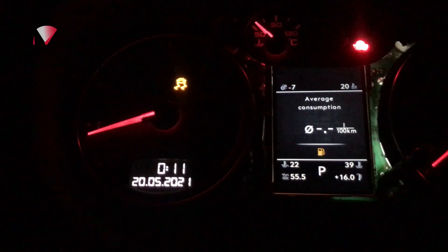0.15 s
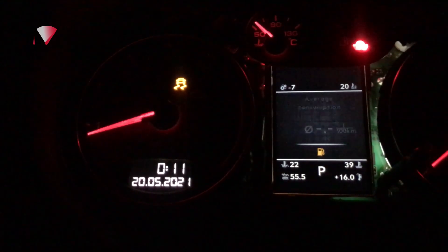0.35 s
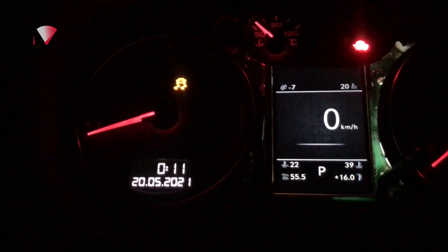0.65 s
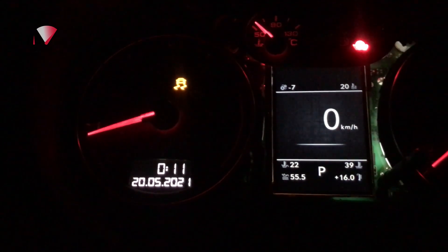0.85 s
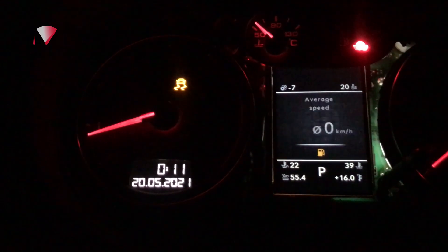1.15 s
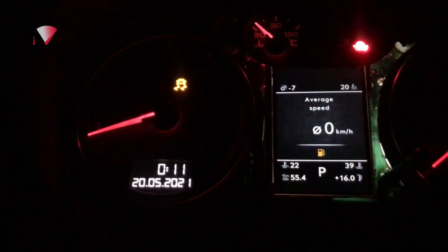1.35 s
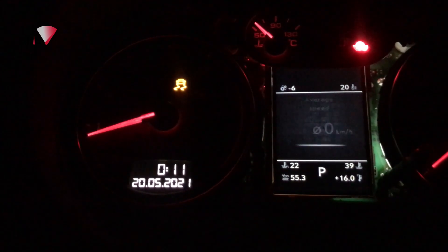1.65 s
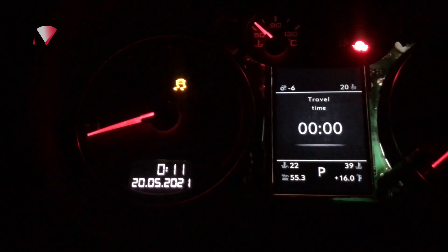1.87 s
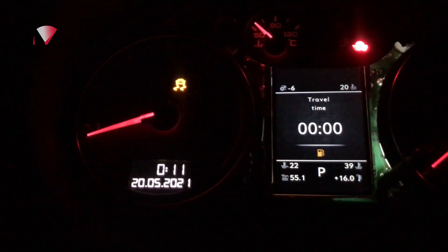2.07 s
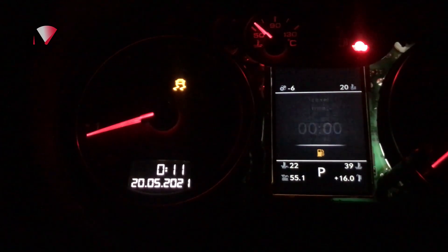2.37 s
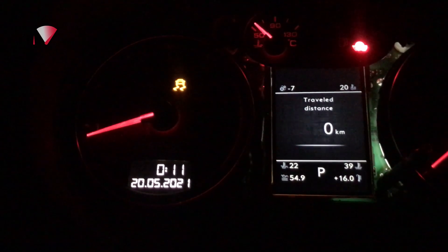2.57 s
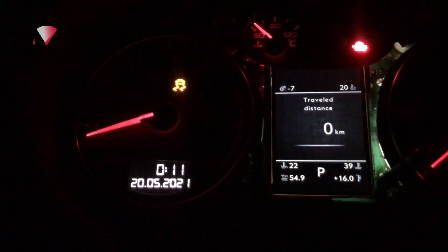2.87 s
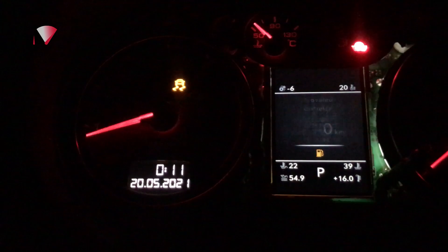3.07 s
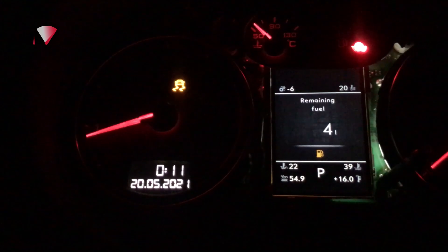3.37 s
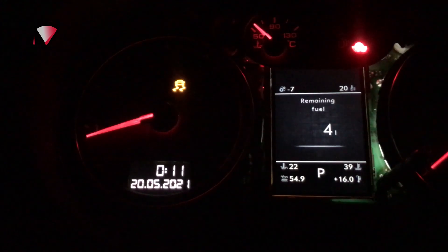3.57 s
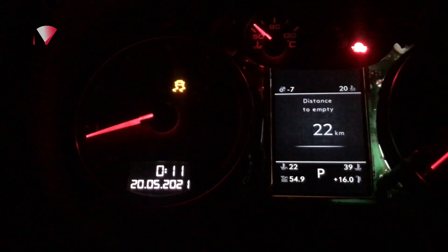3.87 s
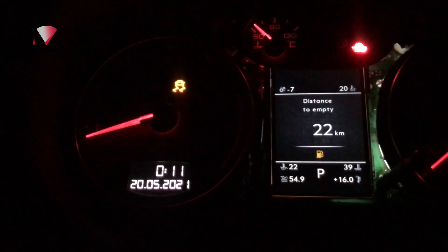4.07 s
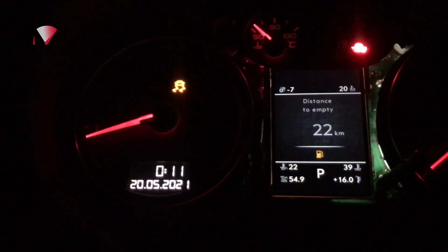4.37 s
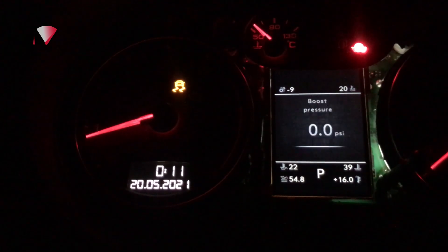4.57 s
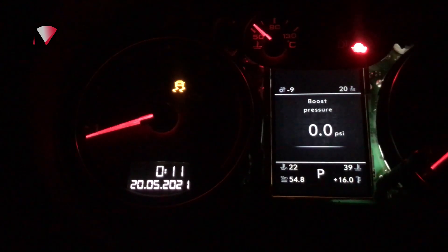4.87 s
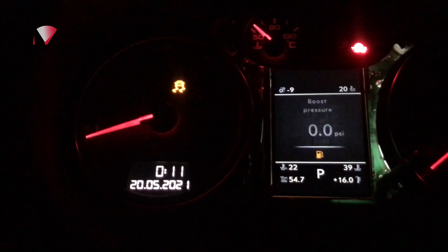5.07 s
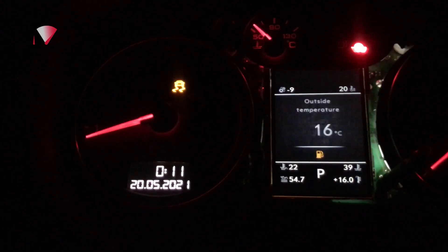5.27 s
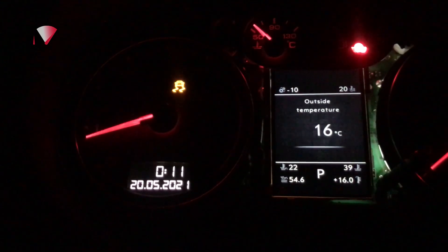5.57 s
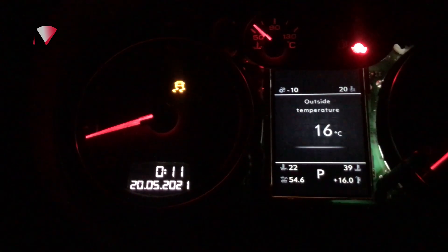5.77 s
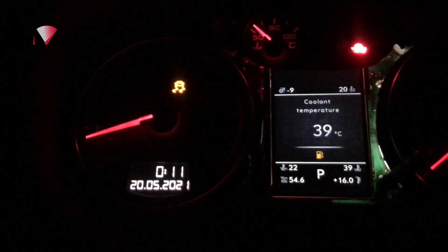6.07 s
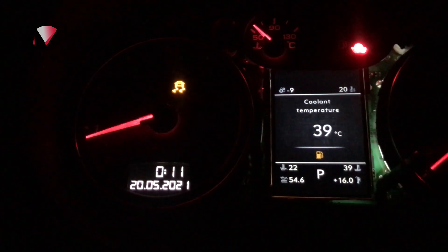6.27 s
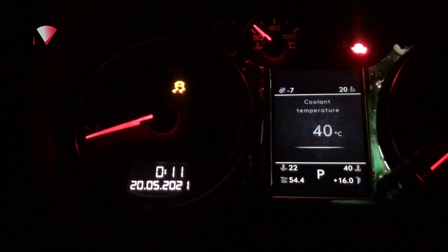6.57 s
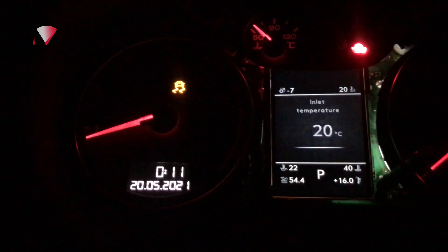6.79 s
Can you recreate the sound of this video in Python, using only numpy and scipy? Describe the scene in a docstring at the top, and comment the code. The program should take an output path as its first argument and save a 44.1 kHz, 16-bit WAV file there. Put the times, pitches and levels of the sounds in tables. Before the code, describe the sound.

In a quiet parked car, a thumb steps steadily through a display with a springy button. Crisp, snappy presses alternate with muted releases that knock and scrape slightly. The last three presses rattle more and come closer together, about half a second apart. The engine idles very softly underneath, low and slightly wavering, with fan air, hiss and tiny ticks. The microphone is close, and the cabin adds only a very short tail.

```python
"""Trip computer button in an idling car

Inside a parked car with the engine idling, a thumb steps through the trip computer with a button on a control stalk.
Each press is a spring snap and a cap rattle, then a knock on the column housing: damped modes, softened by contact.
Each release is a duller knock with a slight scrape of filtered noise. The small padded cabin adds a short noise tail.
The engine hums in sine orders under shaped noise for rumble, fan air and hiss, with narrow whines and tiny ticks."""
import sys
import numpy as np
from scipy import signal
from scipy.fft import rfft, irfft
from scipy.io import wavfile

SR = 44100
rng = np.random.default_rng(int(sys.argv[2]) if len(sys.argv) > 2 else 0)


def generate_wav(signal):
    """Clip the signal to [-1, 1] and save it as 16-bit WAV at the path in sys.argv[1]."""
    frames = np.transpose(np.atleast_2d(signal))
    scaled = np.clip(frames, -1, 1) * 32767
    pcm = np.round(scaled).astype(np.int16)
    wavfile.write(sys.argv[1], SR, pcm)


N = 305613
TIME = np.arange(N) / SR

# Engine hum: order (multiple of the cycle rate; the sixth is the firing rate), level_db (rms, before its waver)
ENGINE_ORDERS = [(5, -78), (6, -46), (7, -49), (8, -80), (9, -53), (10, -65), (11, -60), (12, -54.5),
                 (17, -60), (18, -58.5), (19, -57.5), (21, -65.5), (23, -67), (30, -66.5), (31, -69),
                 (33, -81.5)]
# Spectrum shape of cabin rumble and fan air: pitch_hz, relative_level_db (per Hz)
AIR_SPECTRUM = [(20, -15), (32, 0), (50, -6.5), (80, -4), (150, -4), (200, -9), (300, -14.5), (420, -19.5),
                (620, -21), (800, -28), (1200, -30), (1800, -40), (3200, -40.5), (16000, -72)]
# Faint whines: pitch_hz, width_hz (at half amplitude), level_db (rms)
WHINES = [(182.4, 16, -69), (280.3, 26, -69.5), (401, 28, -76), (552.6, 29, -76.5), (938, 140, -78.5),
          (1521, 72, -81)]
# Spectrum shape of microphone hiss: pitch_hz, relative_level_db (per Hz)
HISS_SPECTRUM = [(2000, -13), (4800, -12.5), (6000, -2.5), (7600, -8), (9000, -3), (10300, -10),
                 (12500, -2.5), (15500, 1), (17000, -9)]
# Modes of the column housing, button cap, spring and stalk: pitch_hz, level_db, t60_s
# Each stroke adds its own gain and shifts the ring slightly; all but the spring are also softened.
HOUSING_MODES = [(392, -55.5, .13), (505, -56.8, .13), (576, -49.7, .12), (656, -34.6, .031),
                 (798, -52, .065), (887, -52, .074), (986, -47.3, .066), (1118, -40.8, .046),
                 (1249, -50.5, .048), (1379, -45.8, .036), (1422, -48, .034)]
CAP_MODES = [(3020, -48, .027), (3210, -41, .019), (3330, -42.5, .014), (3622, -44.6, .02),
             (3870, -39, .017), (4010, -39.3, .014)]
SPRING_MODES = [(5297, -57, .016), (6859, -55.5, .016), (7170, -44.5, .015), (7302, -40.5, .017),
                (8464, -44, .009), (9168, -44, .006), (10031, -49.5, .011), (11925, -38.5, .004),
                (12558, -42.5, .008), (13750, -38, .006), (14500, -52, .013), (15345, -43, .014)]
STALK_MODES = [(2140, -37.5, .014)]
# The spring sets the force of every throw, so snap and knock repeat over the presses;
# only the rattle of the cap depends on how the thumb sits.
# Presses: start_s, cap_rattle_db
PRESSES = [(.0401, 0), (.8291, 1.5), (1.4904, 3.5), (2.1057, 1.5), (2.7887, -0.5), (3.5395, -1),
           (4.2597, -1.5), (5.0127, -0.9), (5.7789, 8), (6.3036, 6), (6.8101, 5.5)]
# Releases: start_s, cap_rattle_db
RELEASES = [(.3005, -22), (.9772, -16), (1.6695, -25), (2.3219, -25), (2.9924, -33), (3.7338, -30.5),
            (4.4038, -41), (5.2201, -36), (5.9133, -23), (6.4498, -4.5)]
# Light touches of the thumb on the button: start_s, cap_rattle_db
TOUCHES = [(1.966, -38), (5.934, -28)]

IDLE_HZ = 6.02  # mean engine cycles per second
AIR_DB, HISS_DB = -53.5, -76.5  # rms, before their slow drift
# The top of the hiss swells briefly
HISS_SWELL_AT_S, HISS_SWELL_LENGTH_S, HISS_SWELL_DB = 1.17, 0.28, -69
# The thumb shifts its grip once, sliding over the cap
SLIDE_AT_S, SLIDE_LENGTH_S, SLIDE_DB = 5.55, 0.15, -78
# The thumb damps the returning spring: dB of snap and scrape lost for each dB less of cap rattle
THUMB_DAMPING = 0.49
TOP_HZ = 16000


def undb(db):
    """Decibels to gain."""
    return 10 ** (np.asarray(db) / 20)


def decay(age_s, t60_s):
    """Exponential decay that falls 60 dB in t60_s."""
    return np.exp(-np.log(1000) * age_s / t60_s)


def noise(gain_at):
    """Noise of rms 1 whose spectrum follows a function of frequency."""
    hz = np.fft.rfftfreq(N, 1 / SR) + 1e-6
    shaped = irfft(rfft(rng.standard_normal(N)) * gain_at(hz), N)
    return shaped / np.sqrt(np.mean(shaped ** 2))


def coloured(points):
    """Noise of rms 1 with a spectrum drawn through (Hz, dB) points."""
    hz, db = np.transpose(points)
    return noise(lambda f: undb(np.interp(np.log(f), np.log(hz), db)))


def resonance(f, centre_hz, width_hz):
    """Gain of a single peak, half as high at the edges of its width."""
    return 1 / (1 + (2 * (f - centre_hz) / width_hz) ** 2)


def walk(rate_hz):
    """Slow random drift: a new level rate_hz times a second, joined by straight lines."""
    levels = rng.standard_normal(256)
    return np.interp(TIME * rate_hz, np.arange(len(levels)), levels)


def swell(centre_s, length_s):
    """A smooth rise and fall."""
    return np.exp(-(2 * (TIME - centre_s) / length_s) ** 2)


def engine(waver_db):
    """Idle hum: the firing rate and its neighbours beat once an engine cycle."""
    turns = np.cumsum(IDLE_HZ * (1 + 0.0025 * walk(1))) / SR
    hum = np.zeros(N)
    for order, db in ENGINE_ORDERS:
        level = np.sqrt(2) * undb(db + waver_db * walk(1.4))
        hum += level * np.sin(2 * np.pi * (order * turns + rng.random()))
    return hum


def air(flutter_db):
    """Rumble and fan air with a few narrow whines from pumps and panels."""
    whines = np.zeros(N)
    for centre_hz, width_hz, db in WHINES:
        whines += undb(db) * noise(lambda f: resonance(f, centre_hz, width_hz))
    return undb(AIR_DB + flutter_db * walk(14)) * coloured(AIR_SPECTRUM) + whines


def hiss(waver_db):
    """Thin high hiss that wavers slightly; its very top swells once."""
    steady = undb(HISS_DB + waver_db * walk(4.4)) * coloured(HISS_SPECTRUM)
    top = noise(lambda f: np.minimum(f / 13500, 1) ** 6)
    return steady + undb(HISS_SWELL_DB) * swell(HISS_SWELL_AT_S, HISS_SWELL_LENGTH_S) * top


def faint_ticks(per_second, tick_db, t60_s):
    """Tiny high ticks of random strength scattered through the hiss."""
    hits = (rng.random(N) < per_second / SR) * rng.random(N)
    envelope = signal.lfilter([1], [1, -decay(1 / SR, t60_s)], hits)
    return undb(tick_db) * envelope * noise(lambda f: np.minimum(f / 13000, 1) ** 2)


def cap_noise(modes, width_hz):
    """Friction noise coloured by modes of the cap."""
    return noise(lambda f: sum(undb(db) * resonance(f, hz, width_hz) for hz, db, _ in modes))


def slide():
    """Skin rubbing over the cap faintly stirs its highest mode."""
    return undb(SLIDE_DB) * swell(SLIDE_AT_S, SLIDE_LENGTH_S) * cap_noise(CAP_MODES[-1:], width_hz=450)


def scrape(strokes, scrape_db, peak_s):
    """The cap grates briefly in its guide as it springs back."""
    envelope = np.zeros(N)
    for start_s, cap_db in strokes:
        age = np.maximum(TIME - start_s, 0) / peak_s
        envelope += undb(scrape_db + THUMB_DAMPING * cap_db) * age * np.exp(1 - age)
    return envelope * cap_noise(CAP_MODES, width_hz=900)


def ring(modes, t):
    """Damped modes struck at t = 0."""
    hz, db, t60_s = np.transpose(modes)[:, :, None]
    age = np.maximum(t, 0)
    partials = undb(db) * decay(age, t60_s) * np.cos(2 * np.pi * hz * age)
    return (t >= 0) * np.sum(partials, axis=0)


def soften(x, hz):
    """A yielding contact spreads the blow in time and takes off its treble."""
    return signal.sosfilt(signal.butter(2, hz, fs=SR, output="sos"), x)


def stroke(t, housing_db, cap_db, spring_db, travel_s, contact_hz):
    """One throw: the spring snaps, the cap rattles, and after its travel the button knocks on its stop."""
    touch_s, rattle_s, rebound_s = 0.00026, 0.00148, 0.0017
    spring = ring(SPRING_MODES, t) + 0.45 * ring(SPRING_MODES, t - rebound_s)
    # the small plastic parts around it have too many modes to tell apart
    spring += undb(-47) * rng.standard_normal(len(t)) * decay(t, 0.058)
    # the stalk is shaken by the snap and the knock alike
    stalk_db = (housing_db + spring_db) / 2
    plastic = np.zeros(len(t))
    for hit_s, size in ((touch_s, 1), (rattle_s, 0.45)):
        plastic += size * undb(cap_db) * ring(CAP_MODES, t - hit_s)
        plastic += size * undb(stalk_db) * ring(STALK_MODES, t - hit_s)
    housing = soften(ring(HOUSING_MODES, t - travel_s), contact_hz)
    return undb(spring_db) * spring + soften(plastic, hz=4630) + undb(housing_db) * housing


def button(strokes, knock_db, snap_db, damping, travel_s, contact_hz):
    """Strokes of one kind share a knock and a base snap; each ring's pitch and speed vary slightly at random."""
    out = np.zeros(N)
    t = np.arange(SR // 10) / SR
    for start_s, cap_db in strokes:
        start = int(start_s * SR)
        stretched = t * (1 + 0.0016 * rng.standard_normal())
        click = stroke(stretched, knock_db, cap_db, snap_db + damping * cap_db, travel_s, contact_hz)
        out[start:start + len(t)] += click[:N - start]
    return out


def cabin(x, wet_db, t60_s):
    """Dense reflections from dashboard and glass, soon swallowed by the seats."""
    t = np.arange(SR // 6) / SR
    first_s = 0.003  # gap before the first reflection
    tail = rng.standard_normal(len(t)) * decay(t, t60_s) * (t > first_s)
    return x + undb(wet_db) * signal.fftconvolve(x, tail / np.linalg.norm(tail))[:N]


def scene():
    """Button strokes in the cabin over the idling car."""
    background = engine(waver_db=1.97) + air(flutter_db=2.08) + hiss(waver_db=0.9)
    background += faint_ticks(per_second=19, tick_db=-60.5, t60_s=0.01)
    friction = slide() + scrape(RELEASES, scrape_db=-51, peak_s=0.0034)
    clicks = button(PRESSES, knock_db=0.35, snap_db=-0.5, damping=0, travel_s=0.001942, contact_hz=2630)
    clicks += button(RELEASES, knock_db=-0.7, snap_db=-11, damping=THUMB_DAMPING,
                     travel_s=0.001905, contact_hz=1106)
    clicks += button(TOUCHES, knock_db=-21, snap_db=-16, damping=THUMB_DAMPING,
                     travel_s=0.0024, contact_hz=1600)
    return (cabin(clicks + friction, wet_db=-16, t60_s=0.059) + background)[None]


def record(dry):
    """A steep low-pass cuts the top."""
    return signal.sosfilt(signal.ellip(8, 0.2, 80, TOP_HZ, fs=SR, output="sos"), dry)


dry = scene()
out = record(dry)
generate_wav(out)
```